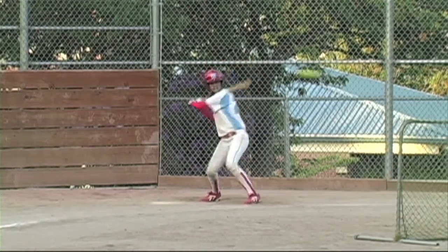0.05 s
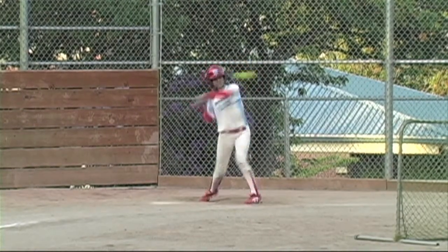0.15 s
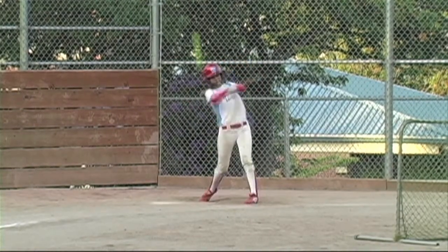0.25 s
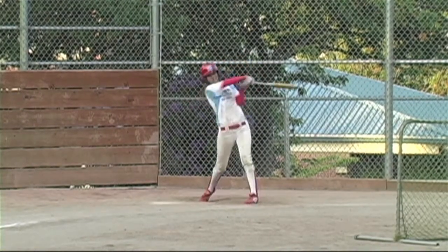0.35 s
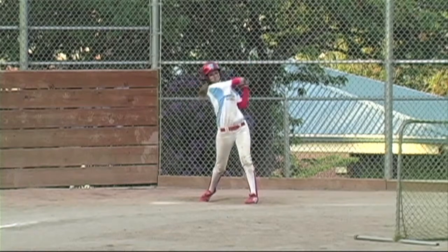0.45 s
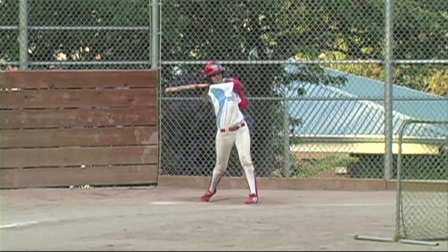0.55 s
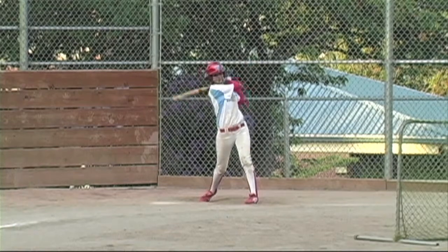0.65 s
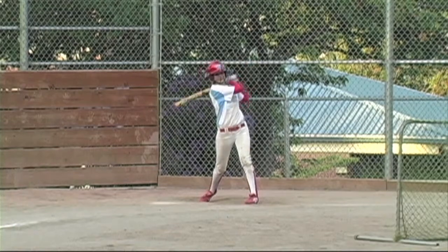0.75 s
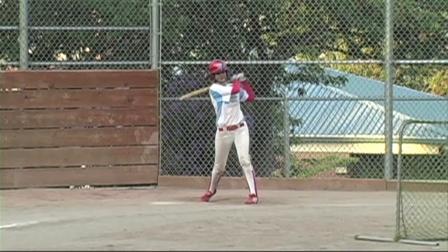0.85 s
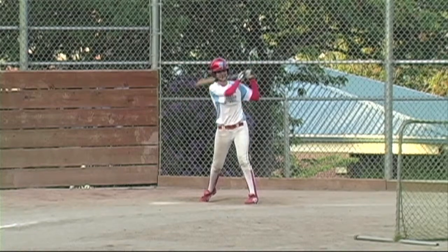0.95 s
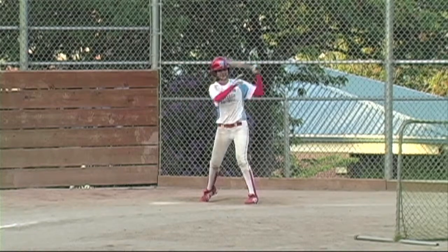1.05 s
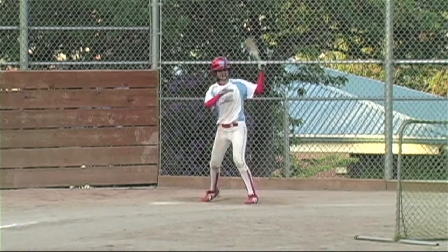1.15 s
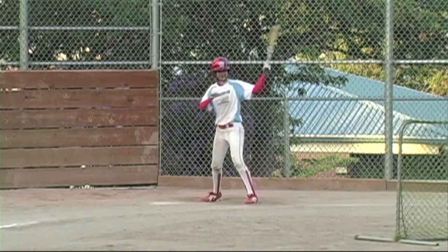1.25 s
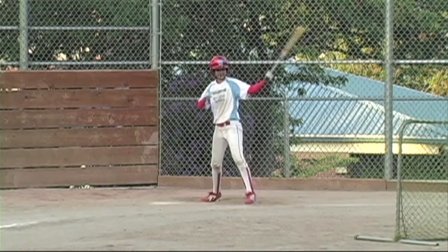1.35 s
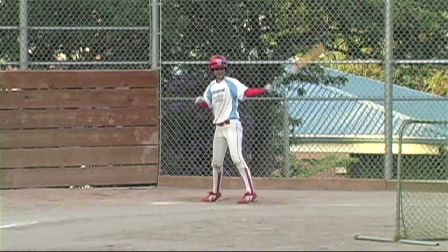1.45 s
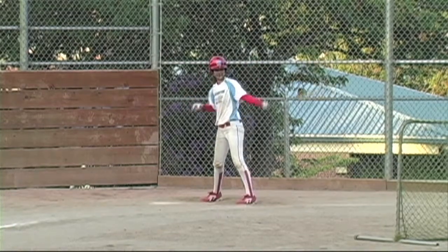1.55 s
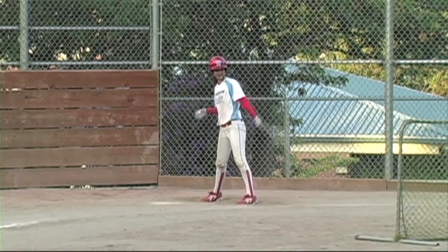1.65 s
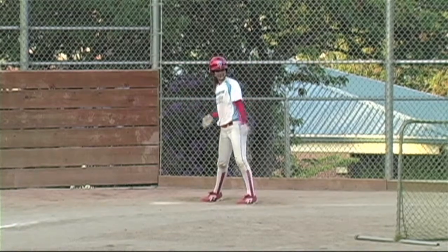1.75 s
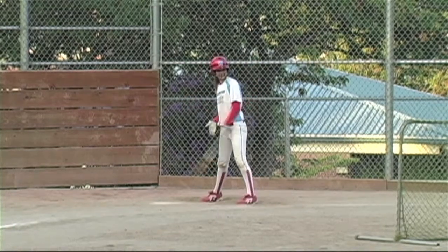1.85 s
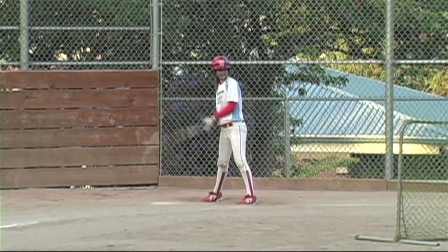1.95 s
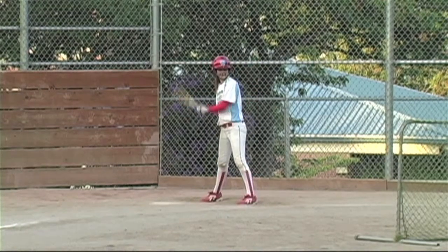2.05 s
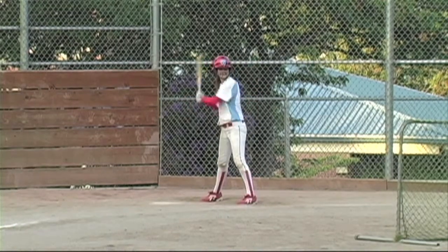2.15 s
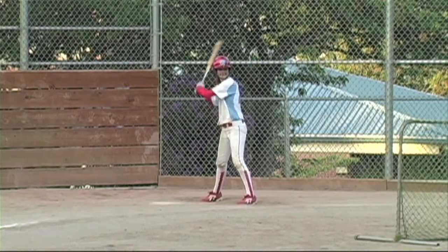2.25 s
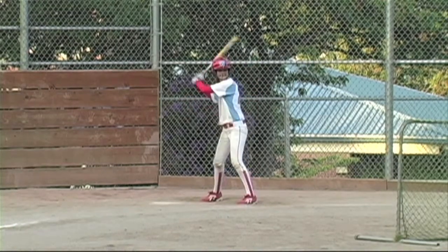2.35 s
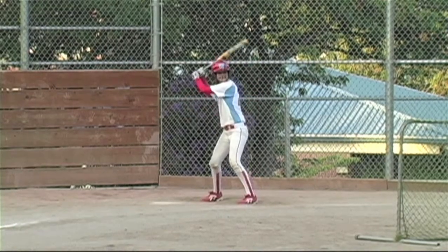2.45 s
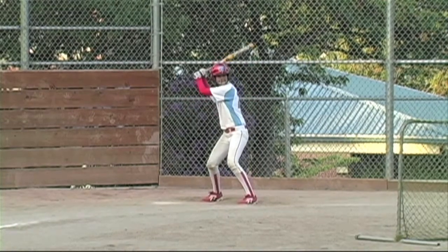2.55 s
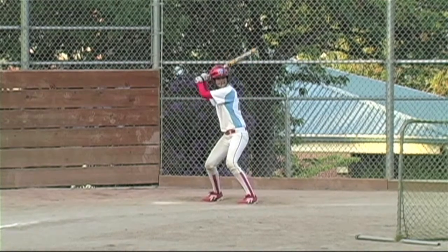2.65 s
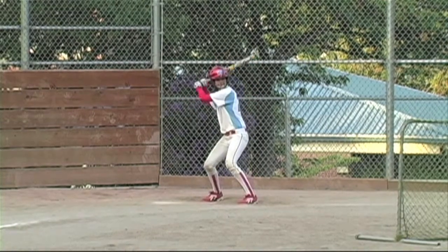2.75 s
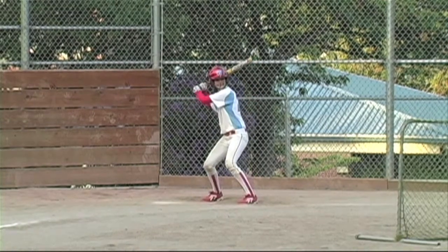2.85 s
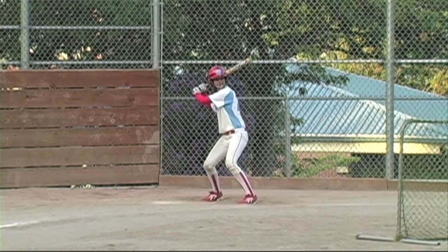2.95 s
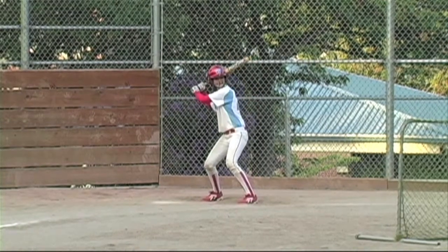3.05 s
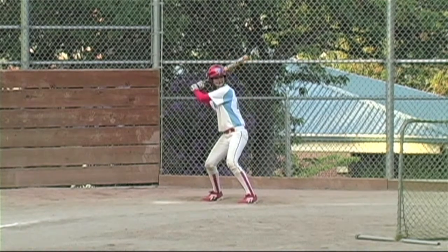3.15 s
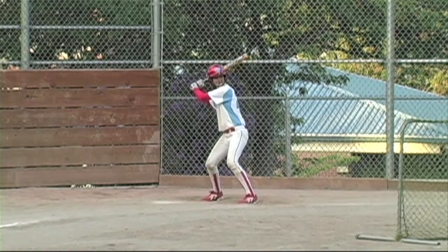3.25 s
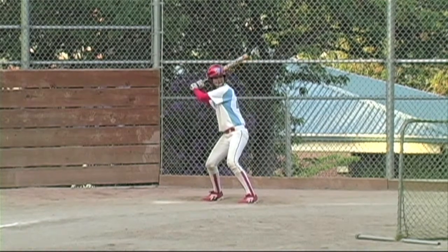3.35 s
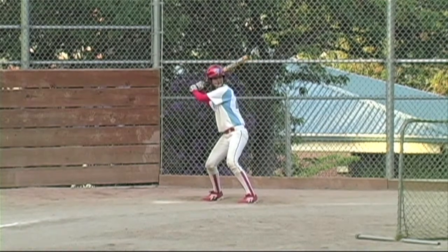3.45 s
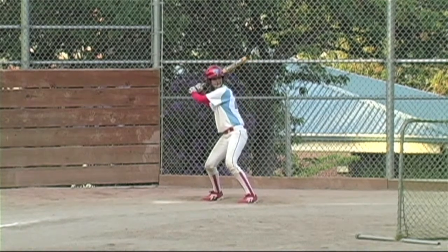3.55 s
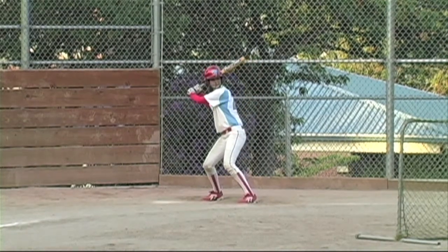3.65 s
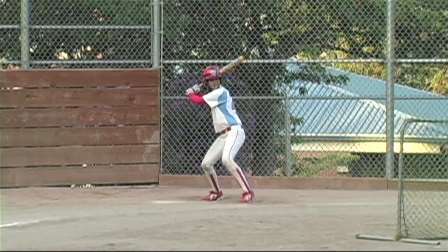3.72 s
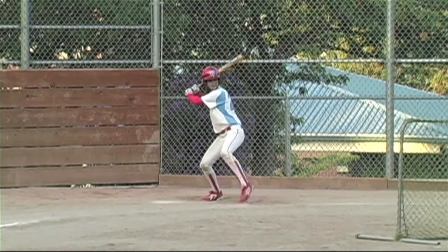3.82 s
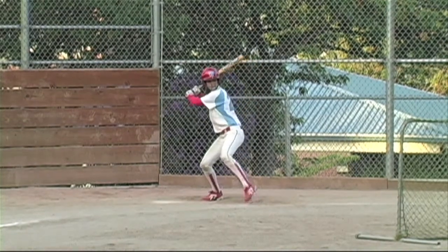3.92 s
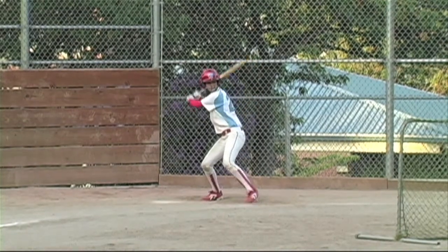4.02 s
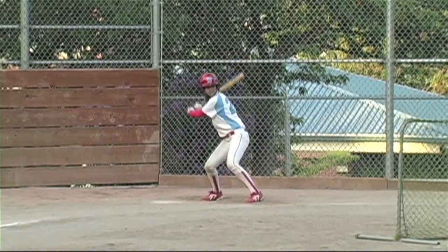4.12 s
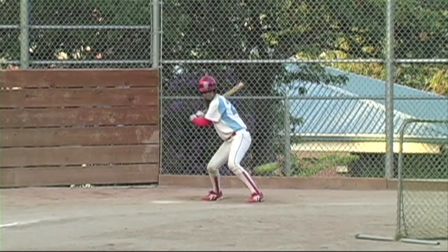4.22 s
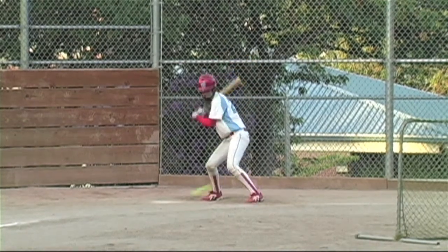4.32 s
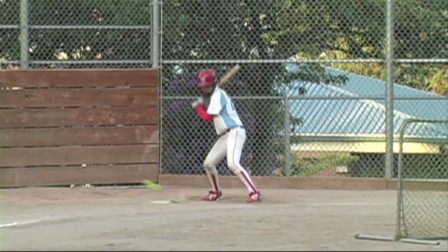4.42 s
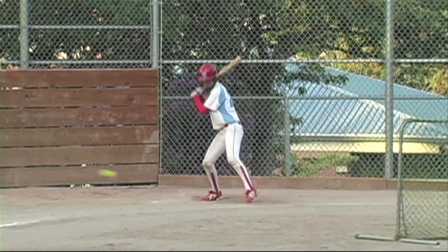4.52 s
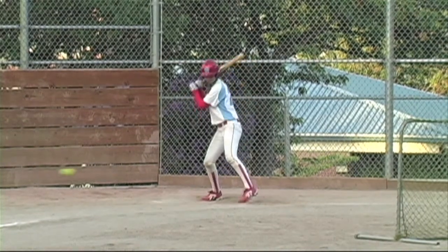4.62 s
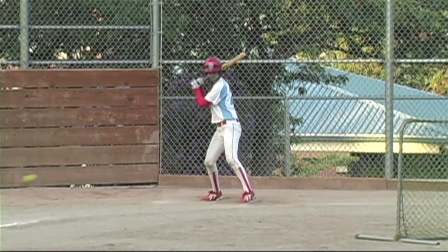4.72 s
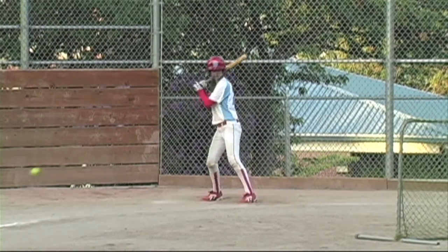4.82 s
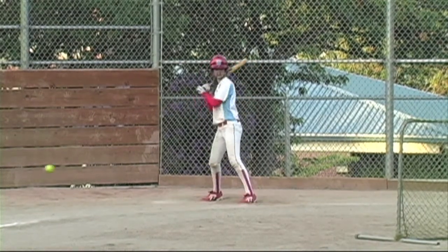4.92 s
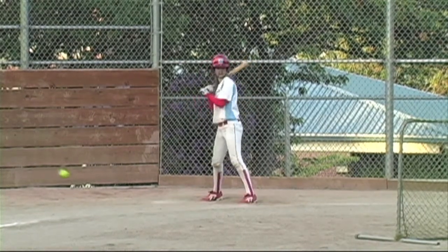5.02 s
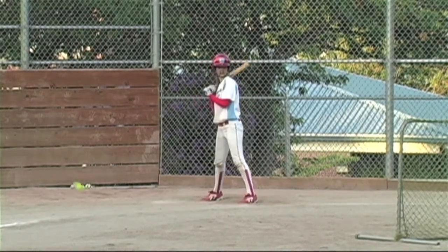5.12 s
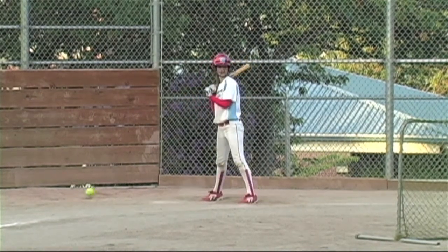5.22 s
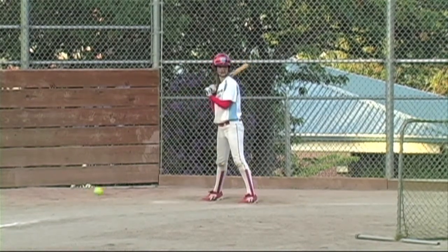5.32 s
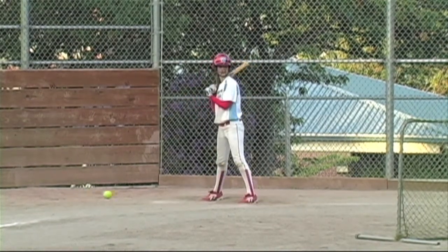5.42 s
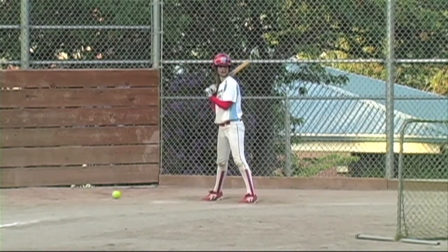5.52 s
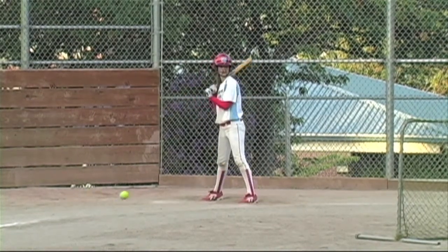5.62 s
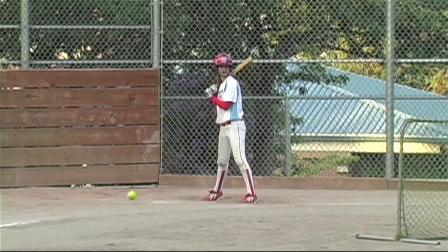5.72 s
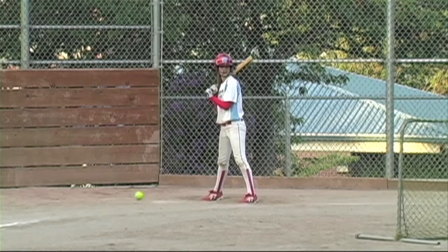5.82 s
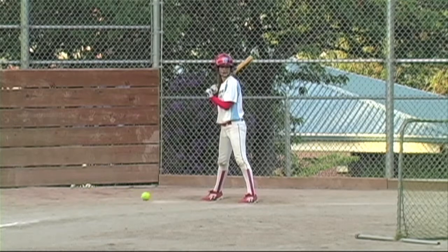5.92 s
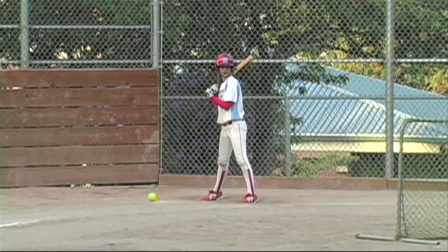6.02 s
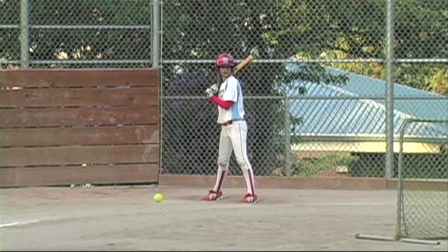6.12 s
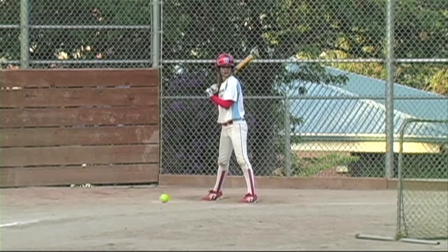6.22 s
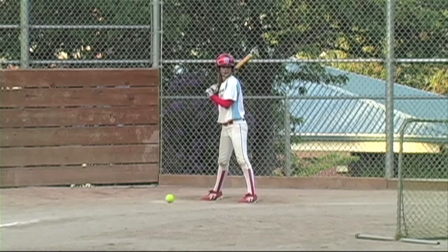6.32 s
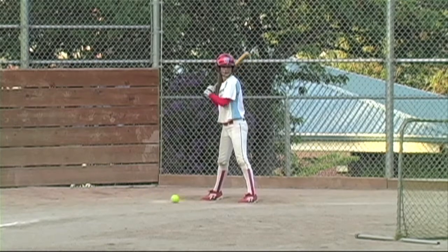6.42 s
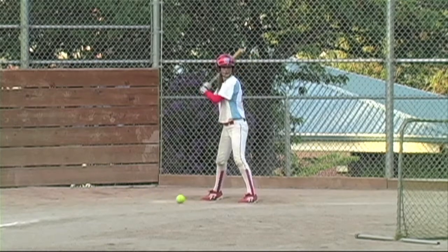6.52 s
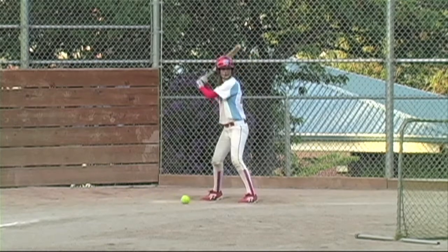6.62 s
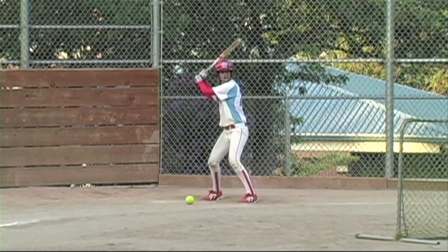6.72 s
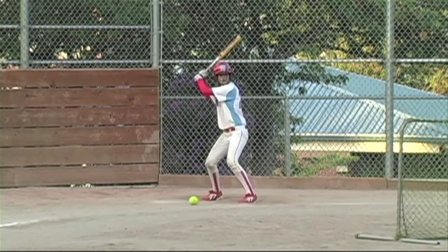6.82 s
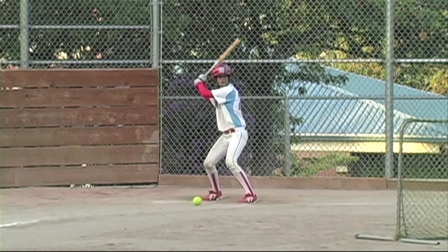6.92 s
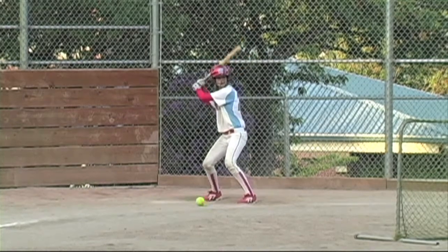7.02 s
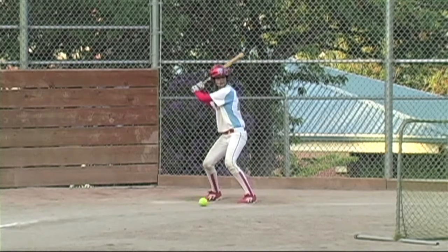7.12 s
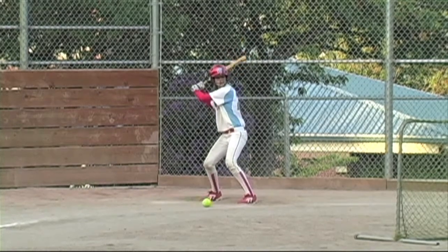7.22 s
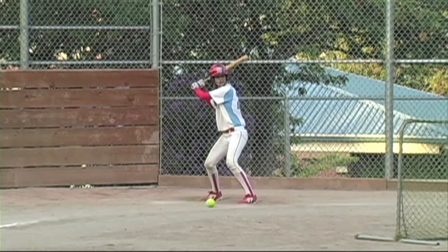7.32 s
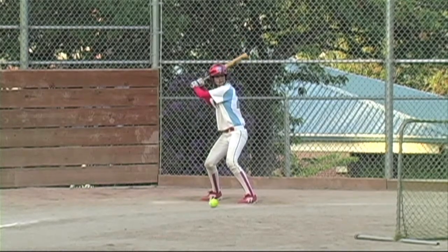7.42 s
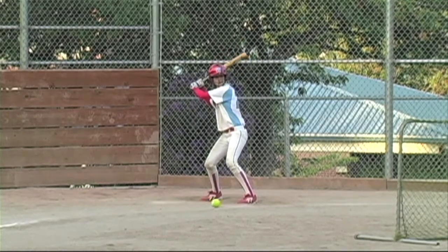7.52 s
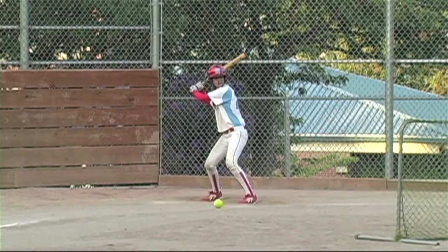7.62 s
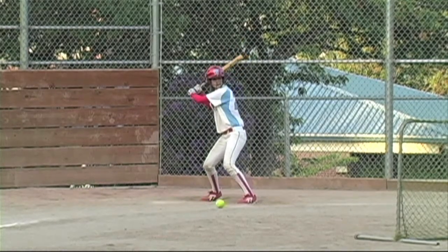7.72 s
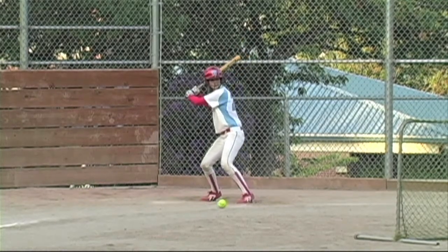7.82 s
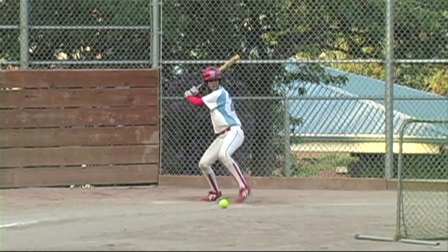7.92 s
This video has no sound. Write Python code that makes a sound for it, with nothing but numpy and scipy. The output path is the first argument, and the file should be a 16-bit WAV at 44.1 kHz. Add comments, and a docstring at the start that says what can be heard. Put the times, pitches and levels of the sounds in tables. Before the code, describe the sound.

Over a low distant town rumble and soft hiss, a bat cracks hard on a ball and its ring echoes back. The ball splashes into jangling wire mesh. Small knocks, footsteps and gritty scuffs follow, then the next pitch skips on dirt and booms on wooden planks, rattling and rolling away. Thin birds whistle. Stereo microphone some metres away in open air.

```python
"""Over a low town rumble and hiss, a bat cracks and far fronts return its ring; then the ball splashes into wire mesh.
The next pitch skips on the dirt and booms on the plank backstop; shoes scuff and small birds whistle.
Softball batting practice on a dirt field, heard from some metres away by a stereo microphone.
Blows are short pulses with damped modes, mesh and far scatter are decaying noise bands, grit is grainy noise,
birds are gliding tones; the town is coloured noise, and a faint motor whine wavers over it."""
import sys
import numpy as np
from scipy import signal
from scipy.fft import rfft, irfft, next_fast_len
from scipy.io import wavfile
from scipy.ndimage import uniform_filter1d

SR = 44100
rng = np.random.default_rng(int(sys.argv[2]) if len(sys.argv) > 2 else 0)


def generate_wav(signal):
    """Clip the signal to [-1, 1] and save it as 16-bit WAV at the path in sys.argv[1]."""
    frames = np.transpose(np.atleast_2d(signal))
    scaled = np.clip(frames, -1, 1) * 32767
    pcm = np.round(scaled).astype(np.int16)
    wavfile.write(sys.argv[1], SR, pcm)


N = 351477


def undb(db):
    """Decibels to gain."""
    return 10 ** (np.asarray(db) / 20)


def times(length_s):
    """Sample times over a length in seconds."""
    return np.arange(int(length_s * SR)) / SR


def read(table, hz, column=1):
    """One column of a table at given frequencies, joined on a log frequency axis."""
    table = np.array(table)
    return np.interp(np.log(np.maximum(hz, 1)), np.log(table[:, 0]), table[:, column])


def unit(x):
    """Scale to rms 1."""
    return x / np.sqrt(np.mean(x ** 2))


def add(out, start_s, x):
    """Mix a mono or stereo sound in at a start time."""
    i = max(int(start_s * SR), 0)
    out[:, i:i + x.shape[-1]] += x[..., :N - i]


def lowpass(x, hz):
    """Second-order low-pass."""
    return signal.sosfilt(signal.butter(2, min(hz, .45 * SR), fs=SR, output="sos"), x)


def resonate(x, hz, width_hz):
    """One resonance, gain 1 at its centre."""
    return signal.lfilter(*signal.iirpeak(hz, hz / width_hz, fs=SR), x)


def walk(rate_hz, length=N):
    """Slow random wander, rms 1: random steps at a given rate, smoothed twice."""
    step = int(SR / rate_hz)
    steps = np.repeat(rng.standard_normal(length // step + 1), step)[:length]
    return unit(uniform_filter1d(uniform_filter1d(steps, step), step))


# Stereo spread of sound scattered around the field. Each row: frequency in Hz, side against mid in dB.
SCATTER_WIDTH = [(60, -32), (200, -24), (400, -12.5), (1300, -6.5), (15000, -23)]


def diffuse(size, width=SCATTER_WIDTH):
    """Frequencies and stereo spectrum of white noise arriving from all around."""
    hz = np.arange(size // 2 + 1) * SR / size
    mid, side = rfft(rng.standard_normal((2, size)))
    side = side * undb(read(width, hz))
    return hz, np.array([mid + side, mid - side])


def noise(colour, size):
    """Diffuse noise of a given colour, rms 1."""
    fast_size = next_fast_len(size)
    hz, spectrum = diffuse(fast_size)
    return unit(irfft(spectrum * undb(read(colour, hz)), fast_size)[:, :size])


def pulse(colour, size=2048):
    """Minimum-phase pulse of a given spectral shape, its energy as early as possible, peak 1."""
    hz = np.arange(size // 2 + 1) * SR / size
    cepstrum = irfft(np.log(undb(read(colour, hz))))
    # folding the cepstrum onto positive time makes the pulse causal
    cepstrum[1:size // 2] *= 2
    cepstrum[size // 2 + 1:] = 0
    x = irfft(np.exp(rfft(cepstrum)))
    return x / np.abs(x).max()


def fade(t, t60_s):
    """Exponential decay by 60 dB in t60."""
    return np.exp(-np.log(1000) * t / t60_s)


def ring(modes, t):
    """Damped modes set off together by one blow."""
    return sum(undb(db) * fade(t, t60_s) * np.sin(2 * np.pi * hz * t) for hz, db, t60_s in modes)


def blow(contact_colour, contact_db, modes, swing_hz):
    """A contact pulse and the modes it rings; the surface dips before it swings out (an all-pass)."""
    x = ring(modes, times(0.6))
    contact = pulse(contact_colour)
    x[:len(contact)] += undb(contact_db) * contact
    g = np.tan(np.pi * min(swing_hz, SR / 4) / SR)
    a = (g - 1) / (g + 1)
    return signal.lfilter([a, 1], [1, a], x)


def wash(bands, rise_s, hold_s=0, size=65536):
    """Dense scatter: swells, holds, then every half octave dies at its own rate."""
    t = np.arange(size) / SR
    hz, spectrum = diffuse(size)
    out = 0
    for centre_hz in 62.5 * 2 ** np.arange(0, 8.5, .5):
        offset = np.clip(2 * np.log2(np.maximum(hz, 1) / centre_hz), -1, 1)
        band = irfft(spectrum * np.cos(np.pi / 2 * offset) ** 2)
        # the same table level means the same strength per octave
        band = band * np.sqrt(SR / 2 / centre_hz / np.log(2))
        decay = fade(np.maximum(t - hold_s, 0), read(bands, centre_hz, column=2))
        out = out + band * undb(read(bands, centre_hz)) * decay
    return out * (1 - np.exp(-t / rise_s))


def echoes(x, returns):
    """Reflections from rough surfaces, each smeared into a decaying cluster of random grain."""
    t = times(1)
    response = np.zeros((2, len(t)))
    grain = irfft(diffuse(len(t))[1], len(t))
    for delay_s, db, smear_s in returns:
        age = np.maximum(t - delay_s, 0) / smear_s
        cluster = grain * (t >= delay_s) * np.exp(-2 * age)
        response += undb(db) * cluster / np.sqrt(np.sum(cluster ** 2) / 2)
    return signal.fftconvolve(x[None], response, axes=1)


# Colour of the town rumble and hiss. Each row: frequency in Hz, relative density in dB per Hz.
TOWN_COLOUR = [(15, -48), (25, -10.5), (44, 0.5), (86, -2), (113, -5.5), (148, -1), (173, -9), (349, -10.5),
               (509, -15.5), (919, -16), (1620, -25), (4260, -34), (5280, -34), (6550, -37.5),
               (15500, -41.5)]
# Stereo spread of the background. Each row: frequency in Hz, side against mid in dB.
TOWN_WIDTH = [(60, -34), (100, -33), (135, 0), (200, -15), (330, -13.5), (700, -7.5), (1300, -5.5),
              (4400, -0.5), (10000, 0.5)]
# The rumble leans right. Each row: frequency in Hz, left minus right in dB.
TOWN_LEAN = [(60, -0.5), (110, -2.5), (180, -3), (380, -0.5), (700, -1.5), (2400, -0.5)]
# Faint motor hum and whine. Each row: frequency in Hz, rms level in dB before wavering.
WHINE = [(86, -61.5), (4797, -83), (5093, -86), (5394, -80.5), (5696, -89), (10492, -88), (10788, -86.5)]
TOWN_DB = -50.5


def town(swell_db=0.03, waver_db=2):
    """Rumble that swells gently under a smooth hiss; a faint motor whine wavers in level and phase."""
    size = next_fast_len(N)
    hz, spectrum = diffuse(size, TOWN_WIDTH)
    lean_db = read(TOWN_LEAN, hz) * np.array([[.5], [-.5]])
    colour = undb(read(TOWN_COLOUR, hz) + lean_db)
    air = unit(irfft(spectrum * colour, size)[:, :N]) * undb(TOWN_DB)
    rumble = signal.sosfilt(signal.butter(1, 900, fs=SR, output="sos"), air)
    t = np.arange(N) / SR
    whine = np.zeros(N)
    for tone_hz, db in WHINE:
        level = undb(db + waver_db * walk(5)) * np.sqrt(2)
        whine += level * np.sin(2 * np.pi * tone_hz * t + walk(14))
    return air + rumble * (undb(swell_db * walk(3.85)) - 1) + whine


def whistle(hz):
    """A pure tone on a pitch course, with soft ends."""
    return np.sin(2 * np.pi * np.cumsum(hz) / SR) * signal.windows.tukey(len(hz), .5)


# Held whistles that dip and recover. Each row: time of the dip in seconds, held pitch in Hz, level at the dip in dB.
BIRD_CALLS = [(2.003, 4000, -70), (3.557, 4200, -65.5), (5.681, 4540, -65.5), (7.463, 4140, -60.5)]
# Falling slurs of the same bird. Each row: start in seconds, starting pitch in Hz, level in dB.
BIRD_SLURS = [(1.89, 4750, -67), (2.022, 5130, -67)]
DIP_SHARE, DIP_FALL_S, DIP_RISE_S = .27, .018, .012  # share of the held pitch; widths either side
CALL_SWELL_DB_PER_S = 90  # each call grows louder towards its end
CALL_LEAD_S, CALL_LENGTH_S = .047, 0.085  # start before the dip; whole call
SLUR_HZ_PER_S, SLUR_LENGTH_S = 42000, .048


def birds(flutter_db=4, leaves_db=-8, leaves_s=0.033):
    """Thin whistles that dip and rise again or just fall, fluttering and blurred through the leaves."""
    out = np.zeros((2, N))
    t = times(CALL_LENGTH_S) - CALL_LEAD_S
    dip = 1 - DIP_SHARE * np.exp(-(t / np.where(t < 0, DIP_FALL_S, DIP_RISE_S)) ** 2)
    for dip_s, held_hz, db in BIRD_CALLS:
        add(out, dip_s - CALL_LEAD_S, undb(db + CALL_SWELL_DB_PER_S * t) * whistle(held_hz * dip))
    for start_s, start_hz, db in BIRD_SLURS:
        add(out, start_s, undb(db) * whistle(start_hz - SLUR_HZ_PER_S * times(SLUR_LENGTH_S)))
    out *= undb(flutter_db * walk(150))
    return out + echoes(out[0], [(0.012, leaves_db, leaves_s)])[:, :N]


# Colour of scraped grit. Each row: multiple of the brightest frequency, relative level in dB.
GRIT_COLOUR = [(.1, -1), (.4, -4), (1, 0.5), (1.8, -9.5), (4, -28)]


def scrape(length_s, bright_hz, grain_db=4):
    """A grainy burst of grit that rises quickly and dies by a factor e in its length."""
    t = times(.5)
    grains = unit(undb(grain_db * walk(1400, len(t))))
    grit = noise(np.array(GRIT_COLOUR) * [bright_hz, 1], len(t)) * grains
    return grit * np.exp(-t / length_s) * (1 - np.exp(-10 * t / length_s))


SHUFFLE_FROM_S, SHUFFLE_TO_S, SHUFFLE_PER_S = 3.84, 4.26, 14
SHUFFLE_DB, SHUFFLE_SPREAD_DB = -62.5, 3
SHUFFLE_LENGTH_S, SHUFFLE_HZ = .04, 3400


def shuffle():
    """Faint scrapes at random moments while the batter settles into the stance."""
    out = np.zeros((2, N))
    for slot_s in np.arange(SHUFFLE_FROM_S, SHUFFLE_TO_S, 1 / SHUFFLE_PER_S):
        late_s = rng.random() / SHUFFLE_PER_S
        db = SHUFFLE_DB + SHUFFLE_SPREAD_DB * rng.standard_normal()
        add(out, slot_s + late_s, undb(db) * scrape(SHUFFLE_LENGTH_S, SHUFFLE_HZ))
    return out


# Shoes and ball scrape loose grit. Each row: start in seconds, level in dB, length in seconds.
SCUFFS = [(2.929, -55, .013), (2.964, -53.5, 0.012), (3.688, -50.5, 0.013), (4.805, -49.5, 0.011),
          (4.842, -49.5, .006), (5.586, -47, 0.0096), (6.508, -49.5, 0.024), (7.635, -50.5, 0.0051)]
# A longer scrape is duller: brightest Hz at a given length, and the power by which it falls
SCUFF_HZ, SCUFF_LENGTH_S, SCUFF_DULLING = 3280, 0.0095, .25
# Knocks on the dirt, some followed by a strong return from the wall in a row of its own.
# Each row: start in seconds, level in dB, grit against body in dB.
KNOCKS = [(1.3749, -29.5, -24), (1.393, -35, -24), (1.66, -38, -16), (1.834, -42, -16), (2.3853, -25, -0.5),
          (4.511, -32, 3), (4.531, -34, 0.5), (5.457, -36, -1), (5.483, -40, 4.5)]
# Body of a knock. Each row: frequency in Hz, relative level in dB.
KNOCK_BODY = [(100, -22), (400, 2), (700, -2.5), (1200, 0.5), (1800, -17), (4000, -34.5), (14000, -42)]
# Grit of a knock. Each row: frequency in Hz, relative level in dB.
KNOCK_GRIT = [(500, -2), (2200, 6), (3800, -4), (5500, 8.5), (8000, -8), (12000, -8.5), (15000, -28)]
# A grittier knock is brighter: top at 0 dB of grit, and grit per octave of top
KNOCK_TOP_HZ, GRIT_DB_PER_OCTAVE = 11200, 6
SLAP_S, SLAP_DB = 0.018, -9.5  # the planks slap each row back
# Thrown sand falls back, in proportion to the knock's grit
SAND_DELAY_S, SAND_DB, SAND_LENGTH_S, SAND_HZ = .015, -28, 0.042, 6000
# Footfalls. Each row: start in seconds, heel thud in dB, sole crunch in dB.
STEPS = [(.759, -37, -48), (1.826, -39, -60), (2.513, -38.5, -58), (3.337, -40.5, -55), (4.077, -37, -52)]
# Heel thud. Each row: frequency in Hz, relative level in dB.
STEP_BODY = [(40, -26.5), (110, 9), (170, -1), (330, -7.5), (900, -26), (4000, -60)]
HEEL_LAG_S, CRUNCH_LENGTH_S, CRUNCH_HZ = 0.0088, 0.0078, 3500  # the sole crunches before the heel


def ground(spray_db=-5, spray_s=0.0088):
    """Knocks with a slap back from the planks and a fall of sand, footfalls, and grainy scuffs."""
    out = np.zeros((2, N))
    for start_s, db, length_s in SCUFFS:
        bright_hz = SCUFF_HZ * (SCUFF_LENGTH_S / length_s) ** SCUFF_DULLING
        add(out, start_s, undb(db) * scrape(length_s, bright_hz))
    for start_s, db, grit_db in KNOCKS:
        top_hz = KNOCK_TOP_HZ * 2 ** (grit_db / GRIT_DB_PER_OCTAVE)
        contact = pulse(KNOCK_BODY) + undb(grit_db) * pulse(KNOCK_GRIT)
        knock = undb(db) * lowpass(contact, top_hz)
        add(out, start_s, knock)
        add(out, start_s + SLAP_S, undb(SLAP_DB) * knock)
        # kicked-up dirt trails it
        add(out, start_s, echoes(knock, [(0.00076, spray_db, spray_s)]))
        sand = undb(db + grit_db + SAND_DB) * scrape(SAND_LENGTH_S, SAND_HZ)
        add(out, start_s + SAND_DELAY_S, sand)
    for start_s, thud_db, crunch_db in STEPS:
        add(out, start_s, undb(crunch_db) * scrape(CRUNCH_LENGTH_S, CRUNCH_HZ))
        add(out, start_s + HEEL_LAG_S, undb(thud_db) * pulse(STEP_BODY))
    return out


WIRE_WIDTH_HZ, WIRE_RISE_S = 190, 0.0086  # spread of pitch among the wires; time to swell


def sing(wire_hz, t60_s):
    """Many wires of nearly one pitch swell and die together: narrow-band noise."""
    t = times(0.98)
    hz, spectrum = diffuse(len(t))
    resonance = 1 / (1 + (2 * (hz - wire_hz) / WIRE_WIDTH_HZ) ** 2)
    wires = unit(irfft(spectrum * resonance, len(t)))
    return wires * fade(t, t60_s) * (1 - np.exp(-t / WIRE_RISE_S))


# Shakes of the wire mesh. Each row: start in seconds, level in dB, rise in seconds.
MESH_SHAKES = [(0.9875, -5, 0.0016), (1.612, -21, 0.003)]
# Its clashing wires. Each row: frequency in Hz, level in dB per octave, t60 in seconds.
MESH_WASH = [(151, -49.5, 0.55), (600, -50.5, 0.76), (1330, -48.5, 0.79), (3020, -37.5, 0.38),
             (5540, -34.5, 0.38), (9100, -36.5, 0.24), (12100, -40.5, 0.3), (15500, -56, .2)]
# Resonances of the mesh. Each row: frequency in Hz, width in Hz, lift in dB.
MESH_PEAKS = [(1166, 99, 10.5), (1840, 76, 2), (3060, 160, 2), (3810, 82, 0), (5300, 200, 3.5),
              (8960, 75, 7)]
# The splash lingers in the open air. Each row: frequency in Hz, level in dB per octave, t60 in seconds.
MESH_AIR = [(300, -56, 1.7), (1200, -60.5, 2.3), (2800, -55.5, 3.2), (5500, -57.5, 2.1), (9000, -55, 1.1),
            (15000, -70, .6)]
# Jolts that set the fence wires singing. Each row: start in seconds, level in dB.
WIRE_JOLTS = [(.762, -64), (.992, -44), (1.659, -61.5), (4.926, -46)]
WIRE_HZ, WIRE_T60_S = 3115, 0.83
# A loose wire taps its post as the fence swings back. Each row: start in seconds, level in dB.
TAPS = [(1.245, -49), (1.357, -53)]
TAP_HZ, TAP_T60_S = 2540, 0.18
# The fence frame on top of the backstop rings with the boom, at BOARD_S
FRAME_HZ, FRAME_DB, FRAME_T60_S = 3200, -34, 0.21
BOARD_S = 4.9058


def mesh(tick_db=-21, clash_db=2):
    """A tick as the ball lands, a spreading clash of wires, its tail in the open air, and singing wires."""
    out = np.zeros((2, N))
    for start_s, db, rise_s in MESH_SHAKES:
        add(out, start_s, undb(db) * wash(MESH_WASH, rise_s, hold_s=0.029))
    out *= undb(clash_db * walk(700))
    out = out + sum((undb(db) - 1) * resonate(out, hz, width_hz) for hz, width_hz, db in MESH_PEAKS)
    landing_s = MESH_SHAKES[0][0]
    add(out, landing_s, wash(MESH_AIR, rise_s=0.036))
    add(out, landing_s, undb(tick_db) * pulse(KNOCK_GRIT))
    for start_s, db in WIRE_JOLTS:
        add(out, start_s, undb(db) * sing(WIRE_HZ, WIRE_T60_S))
    for start_s, db in TAPS:
        add(out, start_s, undb(db) * sing(TAP_HZ, TAP_T60_S))
    add(out, BOARD_S, undb(FRAME_DB) * sing(FRAME_HZ, FRAME_T60_S))
    return out


# Thump of ball on planks. Each row: frequency in Hz, relative level in dB.
BOARD_THUMP = [(25, -37), (70, -19), (150, -17), (450, -3), (750, 5), (1050, -2), (1450, -17.5), (1900, -7),
               (2600, -24), (5000, -32), (14000, -45)]
# Plank modes. Each row: frequency in Hz, level in dB, t60 in seconds.
BOARD_MODES = [(84.6, -45, .35), (131.6, -35, 0.23), (177.2, -31, 0.25), (286, -26.5, 0.21),
               (378, -23, 0.21), (467, -30, 0.28), (579, -9, 0.071), (641, -30, 0.12), (785, -29.5, 0.47),
               (968, -24, 0.11), (1203, -30, 0.14)]
# Far fronts return the boom. Each row: delay in seconds, level in dB.
BOARD_FAR = [(.101, -17.5), (0.275, -21), (.42, -30.5), (.556, -26.5), (.661, -33.5)]
# Loose planks and the mesh above them rattle. Each row: frequency in Hz, level in dB per octave, t60 in seconds.
BOARD_WASH = [(70, -41, 0.47), (248, -40, 0.16), (705, -23, 0.21), (1500, -38.5, 0.2), (2920, -30.5, 0.21),
              (6000, -40.5, 0.35), (10200, -39.5, 0.22), (15000, -58, .15)]
# Then the field rings on. Each row: frequency in Hz, level in dB per octave, t60 in seconds.
BOARD_AIR = [(70, -53, 2.8), (250, -43.5, 2), (560, -35, 2.08), (1240, -47, 2.25), (3000, -52, 2.7),
             (6000, -53, 1.24), (14000, -66, 0.91)]
BOARD_DB, BOARD_SMEAR_S = 0, .05  # thump against modes; smear of each far return


def backstop(baffle_hz=70, left_db=1):
    """The ball booms on the planks; they rattle, and the boom rolls back from far fronts."""
    out = np.zeros((2, N))
    boom = blow(BOARD_THUMP, BOARD_DB, BOARD_MODES, swing_hz=696)
    add(out, BOARD_S, boom)
    far_returns = [(delay_s, db, BOARD_SMEAR_S) for delay_s, db in BOARD_FAR]
    add(out, BOARD_S, echoes(lowpass(boom, hz=670), far_returns))
    add(out, BOARD_S, wash(BOARD_WASH, rise_s=0.00066, hold_s=0.011))
    add(out, BOARD_S, wash(BOARD_AIR, rise_s=0.038))
    out *= undb(left_db * np.array([[.5], [-.5]]))
    # the deepest bass cancels around the edge of the wall
    return signal.sosfilt(signal.butter(3, baffle_hz, "high", fs=SR, output="sos"), out)


FRONT_FIRST_S, FRONT_STEP_S, FRONT_SMEAR_S = .196, .054, 0.076
FRONT_DB, FRONT_FALL_DB = -18, 1.8  # first return; loss from one to the next


def fronts(count):
    """A row of far fronts, each later and weaker: delay in seconds, level in dB, smear in seconds."""
    return [(FRONT_FIRST_S + k * FRONT_STEP_S, FRONT_DB - k * FRONT_FALL_DB, FRONT_SMEAR_S)
            for k in range(count)]


# Click of bat on ball. Each row: frequency in Hz, relative level in dB.
BAT_CLICK = [(150, -23), (400, 10.5), (1000, 1), (2800, 6.5), (4700, 8.5), (7000, 3), (10000, -8),
             (11800, -15), (15000, -52)]
# Bat and ball modes. Each row: frequency in Hz, level in dB, t60 in seconds.
BAT_MODES = [(448, -27, 0.027), (1040, -63, .025), (1318, -17.5, 0.024), (2020, -24, 0.014),
             (2270, -15, 0.008), (3120, -39, 0.027), (4700, -29, 0.013), (6920, -23, .01)]
# Ground, kerb and planks return the crack. Each row: delay in seconds, level in dB, smear in seconds.
BAT_ECHOES = [(.0012, -13, .001), (.004, -23, .002), (0.01, -25.5, .004), (.023, -15.5, .006)]
# Scattered sound after the crack. Each row: frequency in Hz, level in dB per octave, t60 in seconds.
BAT_WASH = [(150, -70, .2), (400, -57, 0.2), (1180, -37.5, 0.14), (2300, -44, 0.13), (5000, -40, 0.22),
            (9000, -46, 0.17), (15000, -58, .12)]
# Its longer tail. Each row: frequency in Hz, level in dB per octave, t60 in seconds.
BAT_AIR = [(300, -75, 1), (1180, -53.5, 2.6), (2500, -59, 2.6), (5000, -57.5, 2.1), (9000, -65, 1),
           (15000, -80, .5)]
BAT_S, BAT_DB = .3785, 0  # start; click against modes


def bat(far_hz=1325, far_width_hz=60, far_ring_db=4.5, far_click_db=-7.0):
    """The crack, its near reflections, and far echoes that carry mostly the barrel's ring."""
    out = np.zeros((2, N))
    crack = blow(BAT_CLICK, BAT_DB, BAT_MODES, swing_hz=3520)
    barrel = resonate(crack, far_hz, far_width_hz)
    add(out, BAT_S, crack)
    add(out, BAT_S, echoes(crack, BAT_ECHOES))
    add(out, BAT_S, echoes(undb(far_ring_db) * barrel, fronts(count=3)))
    # only the nearest front is hard enough to return the click as well
    add(out, BAT_S, echoes(undb(far_click_db) * lowpass(crack, hz=4000), fronts(count=1)))
    add(out, BAT_S, wash(BAT_WASH, rise_s=0.038, hold_s=0.032))
    add(out, BAT_S, wash(BAT_AIR, rise_s=.04))
    return out


def scene():
    """Everything on the field, from the background to the bat."""
    return town() + birds() + shuffle() + ground() + mesh() + backstop() + bat()


def record(dry, ceiling=0.78, low_cut_hz=28, top_hz=15600):
    """The recorder sheds the deepest bass, rounds the highest peaks and cuts the top."""
    thin = signal.sosfilt(signal.butter(2, low_cut_hz, "high", fs=SR, output="sos"), dry)
    rounded = ceiling * np.tanh(thin / ceiling)
    return signal.sosfilt(signal.ellip(8, .2, 80, top_hz, fs=SR, output="sos"), rounded)


dry = scene()
out = record(dry)
generate_wav(out)
```